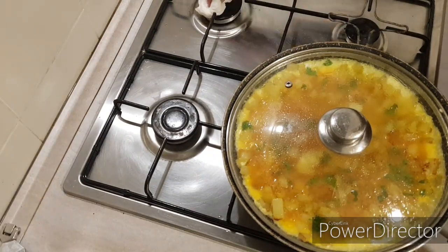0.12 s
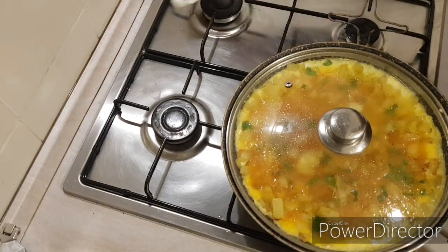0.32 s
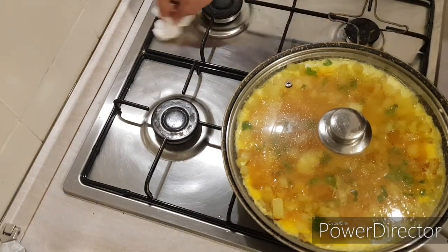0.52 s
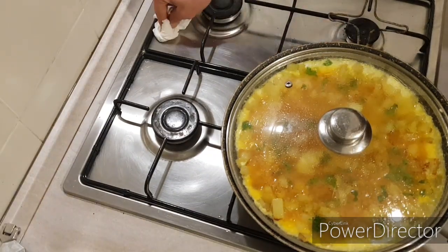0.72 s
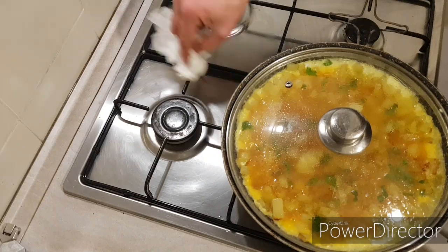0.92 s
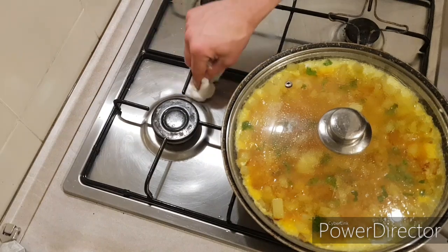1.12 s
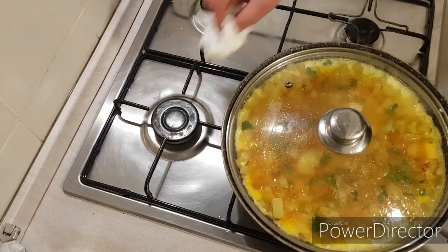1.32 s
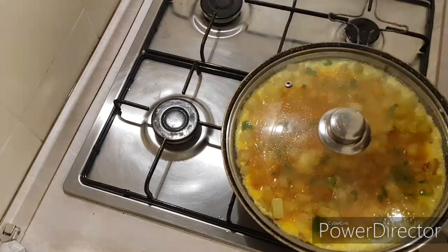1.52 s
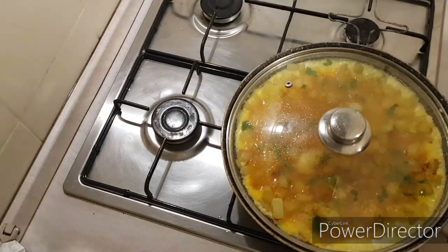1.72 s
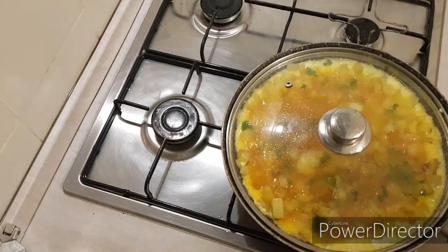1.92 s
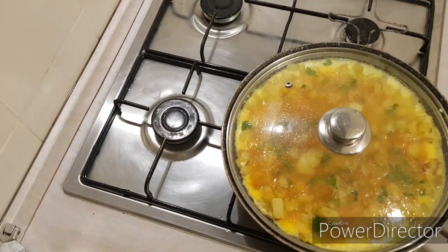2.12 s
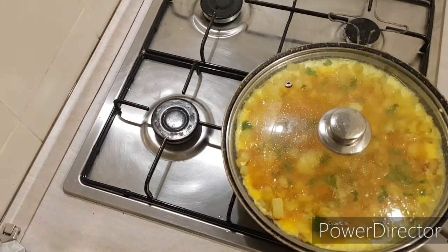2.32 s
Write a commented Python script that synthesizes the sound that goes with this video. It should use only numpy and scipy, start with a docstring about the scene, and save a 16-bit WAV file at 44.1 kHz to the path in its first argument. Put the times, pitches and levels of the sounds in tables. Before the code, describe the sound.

Metal grate on a steel hob clanks right away, preceded by a faint tick; later come a soft floor thump, one duller bump, then cloth rustles and brief squeaks. Low steady simmer beneath, close stereo microphones, short kitchen reverberation.

```python
"""Throughout, a covered pan simmers on a low gas flame: faint filtered-noise hiss, a few whistling bands.
Early on, a hand knocks the iron pan support twice: noise cracks and decaying modes.
Dull bumps on hob and cabinet (low modes, noise thud) and paper-towel wipes (grainy noise) recur to the end.
Then the floor thumps softly under a foot (low modes); late on, the towel squeaks (wavering sines).
A small hard-walled kitchen answers the knocks, bumps, wipes, squeaks and steps with decaying noise."""
import sys
import numpy as np
from scipy import signal
from scipy.fft import rfft, irfft
from scipy.io import wavfile
from scipy.ndimage import uniform_filter1d

SR = 44100
rng = np.random.default_rng(int(sys.argv[2]) if len(sys.argv) > 2 else 0)


def wav_out(sig):
    """Save sig, one row per channel (or a flat mono array), as 16-bit PCM at SR to the path in sys.argv[1]."""
    wavfile.write(sys.argv[1], SR, np.round(np.clip(np.atleast_2d(sig).T, -1, 1) * 32767).astype(np.int16))


def ratio_of_db(decibels):
    """Turn decibels (scalar or array-like) into linear amplitude factors; 0 dB maps to 1."""
    return 10 ** (np.asarray(decibels, float) / 20)


N = 110250

# Knocks on the pan support. Each row: start in seconds, ring level in dB, crack level in dB,
# tilt in dB per octave.
KNOCKS = [(.040, -45, -26.5, 0), (.240, -27, -11, 0.69)]
# Modes of the support and the steel under it. Each row: frequency in Hz, relative level in dB, t60 in seconds.
SUPPORT_MODES = [(147.2, 0, 0.43), (396.3, -5, 0.35), (446, -10, 0.27), (568, -8, 0.52), (595.7, -1, 0.47),
                 (614.6, -20, 0.34), (717, -7.5, 0.19), (1264, -9.5, 0.37), (1530, -12, 0.38),
                 (1548, 8.5, 0.071), (2006, -48, 0.084), (2467, -17, 0.53), (2940, 10, 0.036),
                 (3040, -13, 0.63), (3980, 11, 0.041), (3920, -38, 0.35), (5400, 8, 0.045),
                 (5390, -20, 0.39), (5480, -11, 0.46), (5600, -15, 0.34), (4220, -21, 0.27),
                 (3400, -20, 0.38), (7000, -20.5, .25), (6020, 5.5, 0.053), (7500, -13, 0.12),
                 (8500, -9, 0.18), (10200, -5, 0.056), (12800, -7.5, 0.15)]
# Crack spectrum. Each row: frequency in Hz, relative density in dB per Hz.
CRACK_SPECTRUM = [(59, -34), (100, -7.5), (640, -1.5), (1210, -8.5), (1550, -2), (2370, -8.5), (2930, -7.5),
                  (3930, 0), (4860, -14), (5400, -11), (6660, -16.5), (13400, -27.5), (15500, -53)]
CRACK_RISE_S, CRACK_T60_S, RING_RISE_S = 0.00066, 0.062, 0.0029
WAVER_DB = 2.5  # mode flutter from loose parts

# Dull bumps on hob and cabinet. Each row: start in seconds, level in dB, tilt in dB per octave,
# damping factor (divides mode t60), contact time constant in seconds.
BUMPS = [(0.02, -47.5, -3.5, 2.6, 0.0093), (.041, -46, 2.5, 1.28, 0.0052), (0.157, -37, -5, 2.4, 0.01),
         (.205, -37.5, -5, 0.62, 0.0064), (.241, -28.5, 1.5, 1.95, 0.0013), (.86, -50.5, -6, 2.4, 0.0035),
         (1.130, -24, 1.5, 1.34, 0.0033), (1.41, -51, -2.5, .9, 0.018), (1.915, -54.5, -8.5, 1.7, 0.0035),
         (2.3, -47, .5, 0.7, 0.011), (2.385, -45, 0.5, 1.9, 0.0036), (2.463, -45, -1.5, 1.5, 0.0032)]
# Modes of hob and cabinet. Each row: frequency in Hz, relative level in dB, t60 in seconds at damping 1.
HOB_MODES = [(69.6, -2.5, 0.43), (95.8, 1.5, 0.45), (158, -5.5, 0.24), (197.7, -9.5, .3), (260.2, 1, 0.36),
             (292.2, -6, 0.16), (314.5, -0.5, 0.24), (420, -10.5, 0.59), (445.8, -11.5, 0.36),
             (610.7, -15.5, 0.5), (675, -13, 0.31), (856, -30.5, 0.26)]
# Unpitched part of a bump. Each row: frequency in Hz, relative density in dB per Hz.
THUD_SPECTRUM = [(120, -40), (200, -2), (449, -6), (549, -12), (690, -9), (1170, -19), (2260, -23.5),
                 (2880, -22.5), (5000, -41), (6500, -70), (11000, -120)]
THUD_DB, THUD_T60_S = -5, 0.25

# Towel, sleeve and hand sliding on hob and cabinet; the row at 0.037 s is a brief 3.5 kHz hiss that # follows
# the first knock. Each row: start in seconds, length in seconds before # the fall, level in dB, centre in Hz,
# Gaussian width (sigma) in octaves.
WIPES = [(1.242, 0.15, -52.5, 105, 0.62), (1.249, 0.081, -59, 570, .5), (1.439, .13, -63.5, 118, 0.89),
         (0.037, 0.042, -46.5, 3540, 0.48), (0.147, .09, -46.5, 436, .7), (1.999, 0.14, -60, 2930, 0.8),
         (0.047, 0.07, -51.5, 540, 0.69), (0.667, .07, -57.5, 477, 1.1), (2.328, 0.059, -51, 5050, .9),
         (0.532, 0.035, -57, 8000, 0.7), (0.709, 0.2, -57, 1122, 0.073), (0.739, .28, -63, 576, 1.3),
         (0.762, 0.17, -60, 2620, 0.62), (1.008, 0.047, -48.5, 7860, 3.3), (1.037, .07, -64, 390, 0.18),
         (1.077, 0.051, -50.5, 5800, 2.6), (1.125, 0.043, -44, 7760, 3.3), (1.965, 0.065, -53.5, 695, 0.78),
         (2.05, .12, -57.5, 430, 1.27), (2.299, .035, -42, 1030, 1.1), (2.345, 0.037, -46.5, 1300, 0.78),
         (2.38, .04, -48, 547, 1), (2.419, 0.09, -45.5, 1590, 1.5), (2.467, 0.082, -47, 7050, 1)]
WIPE_RISE_S, WIPE_FALL_S, WIPE_GRAIN_DB = 0.028, 0.04, 4
# Towel squeaks on steel. Each row: start in seconds, length in seconds, level in dB, frequency in Hz,
# rms wobble in Hz.
SQUEAKS = [(2.215, 0.036, -53.5, 1520, 60), (2.348, .006, -41.5, 926, 60), (2.3547, .021, -37, 1130, 109),
           (2.351, .02, -39.5, 1521, 90), (2.433, .038, -38.5, 1517, 30)]
SQUEAK_EDGE_POWER = 0.11  # small: abrupt ends

# Weight shifting on the floor. Each row: start in seconds, level in dB, seconds until stilled.
STEPS = [(.657, -35, .17), (.885, -56.5, .07), (2.16, -65, .04)]
# Floor modes. Each row: frequency in Hz, relative level in dB, t60 in seconds at damping 1.
FLOOR_MODES = [(44.4, -3.5, 0.71), (69.6, 4.5, 0.22), (109.8, -8, 0.71), (149, -9.5, 0.53),
               (257.2, -17, 0.67), (269.5, -20.5, 0.54), (323, -20, 0.23), (403, -26, 0.3)]
STEP_RISE_S, STEP_STILL_S, FLOOR_DAMPING = 0.013, 0.0082, 0.75

# Flame and fat hiss. Each row: frequency in Hz, relative density in dB per Hz.
HISS_SPECTRUM = [(18, -57), (30, -24), (108, -9.5), (225, -26), (324, -18), (399, -29), (432, -20.5),
                 (591, -21), (656, -26), (709, -12), (830, -10), (945, -10.5), (1170, -18), (1360, -3),
                 (1590, -12), (1720, -8.5), (1970, -17.5), (2990, -18), (3680, -11), (7260, -19.5),
                 (8950, -19), (12600, -17.5), (15500, -22)]
HISS_DB = -50
# Burner and lid-vent whistles. Each row: centre in Hz, full width at half amplitude in Hz, level in dB.
WHISTLES = [(1455, 30, -71), (1506, 76, -63.5), (1695, 79, -66), (3595, 50, -63), (12060, 240, -62)]
PATCH_DB, SWELL_DB, FLICKER_DB = 0.85, 0.62, 0.6  # rms of each drift

# Room decay. Each row: frequency in Hz, t60 in seconds.
ROOM_T60 = [(100, 0.8), (500, .46), (1500, 0.63), (4000, .4), (8000, 0.57), (14000, 0.08)]
ROOM_HARD_DB, ROOM_DULL_DB, ROOM_RISE_S = -5.5, -13, 0.015

# Channel likeness. Each row: frequency in Hz, left-right correlation.
LIKENESS = [(60, 0.89), (180, 1), (550, 0.59), (1650, -0.04), (4970, -0.047), (15000, -0.082)]
# Channel balance. Each row: frequency in Hz, left minus right in dB.
BALANCE = [(60, 0), (180, 6), (550, 0), (1650, 1), (4970, -1), (15000, 4.5)]
LOW_CUT_HZ, EDGE_HZ = 25.4, 15650


def evened(x):
    """Scales to rms 1."""
    return x / np.sqrt(np.mean(x ** 2) + 1e-20)


def read(points, hz):
    """Reads a table on a log-frequency axis."""
    f, value = np.transpose(points)
    return np.interp(np.log(hz + 1), np.log(f + 1), value)


def add(mix, start_s, sound):
    """Mixes a stereo sound in at start_s."""
    part = mix[:, round(start_s * SR):][:, :sound.shape[1]]
    part += sound[:, :part.shape[1]]


def stereo_noise(size, gain):
    """Noise of rms 1 with spectrum gain(Hz), most alike left and right in the bass."""
    hz = np.fft.rfftfreq(size, 1 / SR)
    left, other = rfft(rng.standard_normal((2, size)))
    same = np.clip(read(LIKENESS, hz), -1, 1)
    right = same * left + np.sqrt(1 - same ** 2) * other
    return evened(irfft(np.array([left, right]) * gain(hz), size))


def ring(modes, tilt_db, damping, size):
    """Decaying, fluttering sines of alternating sign; high modes differ in phase between microphones."""
    hz, db, t60_s = np.transpose(modes)[:, :, None]
    t = np.arange(size) / SR
    slip = (1 - np.clip(read(LIKENESS, hz), 0, 1)) * np.pi * (2 * rng.random(hz.shape) - 1)
    knots = rng.standard_normal((len(hz), size // 512 + 2))
    waver = np.array([np.interp(t * SR / 512, np.arange(len(k)), k) for k in knots])
    waver *= np.minimum(t * 20, 1)  # flutter grows over 50 ms
    level_db = db + tilt_db * np.log2(hz / hz[0]) - 60 * t * damping / t60_s + WAVER_DB * waver
    gain = ratio_of_db(level_db) * (-1) ** np.arange(len(hz))[:, None]
    return np.array([-(gain * np.sin(2 * np.pi * hz * t + side * slip)).sum(0) for side in (-.5, .5)])


def knocks():
    """Iron on steel: a short broadband crack, and the ring of the support's modes."""
    cracks, rings = np.zeros((2, N)), np.zeros((2, N))
    t = np.arange(SR // 2) / SR
    size = SR // 8
    crack_shape = ratio_of_db(-60 * t / CRACK_T60_S) * np.minimum(t / CRACK_RISE_S, 1)
    ring_rise = np.minimum(t / RING_RISE_S, 1)
    for start_s, ring_db, crack_db, tilt_db in KNOCKS:
        crack = stereo_noise(size, lambda hz: ratio_of_db(read(CRACK_SPECTRUM, hz)
                                                  + tilt_db * np.log2(hz / 1000 + .01)))
        add(cracks, start_s, ratio_of_db(crack_db) * crack_shape[:size] * crack)
        add(rings, start_s, ratio_of_db(ring_db) * ring_rise * ring(SUPPORT_MODES, tilt_db, 1, len(t)))
    return cracks, rings


def bumps():
    """Soft contact sets the low modes of hob and cabinet going, with an unpitched thud."""
    out = np.zeros((2, N))
    t = np.arange(SR // 2) / SR
    thud_shape = ratio_of_db(THUD_DB - 60 * t / THUD_T60_S)
    for start_s, db, tilt_db, damping, contact_s in BUMPS:
        thud = stereo_noise(len(t), lambda hz: ratio_of_db(read(THUD_SPECTRUM, hz)
                                                   + tilt_db * np.log2(hz / 100 + .01)))
        body = ring(HOB_MODES, tilt_db, damping, len(t)) + thud_shape * thud
        add(out, start_s, ratio_of_db(db) * (1 - np.exp(-t / contact_s)) * body)
    return out


def wipes():
    """Sliding friction, and a brief hiss after the first knock: band noise under a grainy random level."""
    out = np.zeros((2, N))
    for start_s, length_s, db, centre_hz, octaves in WIPES:
        t = np.arange(0, length_s + 4 * WIPE_FALL_S, 1 / SR)
        rub = stereo_noise(len(t), lambda hz: np.exp(-.5 * (np.log2((hz + 1) / centre_hz) / octaves) ** 2))
        chance = uniform_filter1d(rng.standard_normal(len(t)), size=200)
        grain = ratio_of_db(WIPE_GRAIN_DB * evened(chance))
        shape = np.minimum(t / WIPE_RISE_S, 1) * np.exp(-np.maximum(t - length_s, 0) / WIPE_FALL_S)
        add(out, start_s, ratio_of_db(db) * shape * grain * rub)
    return out


def squeaks():
    """The towel sticks on the steel: short sines of wavering pitch."""
    out = np.zeros((2, N))
    for start_s, length_s, db, hz, wobble_hz in SQUEAKS:
        t = np.arange(0, length_s, 1 / SR)
        waver_hz = wobble_hz * evened(uniform_filter1d(rng.standard_normal(len(t)), size=120))
        tone = np.sin(2 * np.pi * np.cumsum(hz + waver_hz) / SR)
        tone *= np.sin(np.pi * t / length_s) ** SQUEAK_EDGE_POWER
        add(out, start_s, ratio_of_db(db) * np.array([tone, tone]))
    return out


def steps():
    """The floor's modes boom under a foot and are stilled when the weight settles."""
    out = np.zeros((2, N))
    t = np.arange(SR // 2) / SR
    for start_s, db, length_s in STEPS:
        shape = np.minimum(t / STEP_RISE_S, 1) * np.exp(-np.maximum(t - length_s, 0) / STEP_STILL_S)
        add(out, start_s, ratio_of_db(db) * shape * ring(FLOOR_MODES, 0, FLOOR_DAMPING, len(t)))
    return out


def simmer():
    """Hiss of flame and bubbling fat, drifting in small patches, plus narrow whistling bands."""
    hiss = stereo_noise(N, lambda hz: ratio_of_db(read(HISS_SPECTRUM, hz)))
    z = signal.stft(hiss, nperseg=512, noverlap=384)[2]
    chance = rng.standard_normal(z.shape[1:])  # frequency by time
    patches = uniform_filter1d(uniform_filter1d(chance, size=6, axis=0), size=20, axis=1)
    swell = uniform_filter1d(chance.sum(0), size=100)
    flicker = uniform_filter1d(chance, size=80, axis=0)
    drift_db = PATCH_DB * evened(patches) + SWELL_DB * evened(swell) + FLICKER_DB * evened(flicker)
    hiss = signal.istft(z * ratio_of_db(drift_db), nperseg=512, noverlap=384)[1][:, :N]
    out = ratio_of_db(HISS_DB) * evened(hiss)
    for centre_hz, width_hz, db in WHISTLES:
        out = out + ratio_of_db(db) * stereo_noise(N, lambda hz: 1 / (1 + (2 * (hz - centre_hz) / width_hz) ** 2))
    return out


def kitchen(x):
    """Dense random reflections, each band dying at its own speed."""
    hz, t, z = signal.stft(stereo_noise(SR, np.ones_like), SR, nperseg=256)
    decay = ratio_of_db(-60 * t / read(ROOM_T60, hz)[:, None])
    tail = signal.istft(z * decay, SR, nperseg=256)[1]
    tail = tail * np.minimum(np.arange(tail.shape[1]) / SR / ROOM_RISE_S, 1)
    tail = tail / np.linalg.norm(tail[0])
    return signal.fftconvolve(x.mean(0)[None], tail, axes=1)[:, :N]


def scene():
    """All sources; the room answers noisy sounds more than the ringing carried by the worktop."""
    cracks, rings = knocks()
    hard = cracks + wipes() + squeaks()
    dull = rings + bumps() + steps()
    room = kitchen(ratio_of_db(ROOM_HARD_DB) * hard + ratio_of_db(ROOM_DULL_DB) * dull)
    return simmer() + hard + dull + room


def band_limit(x):
    """A steep low-pass at the top of the band."""
    return signal.sosfilt(signal.butter(12, 16160, fs=SR, output="sos"), x)


def record(dry):
    """Two microphones of frequency-dependent balance, with a low cut and a sharp upper band edge."""
    hz = np.fft.rfftfreq(N, 1 / SR)
    half_db = read(BALANCE, hz) / 2
    low_cut = hz ** 2 / np.sqrt(hz ** 4 + LOW_CUT_HZ ** 4)
    band = low_cut * (hz < EDGE_HZ)
    mix = irfft(rfft(dry) * band * ratio_of_db(np.array([half_db, -half_db])), N)
    return band_limit(mix)


dry = scene()
out = record(dry)
wav_out(out)
```